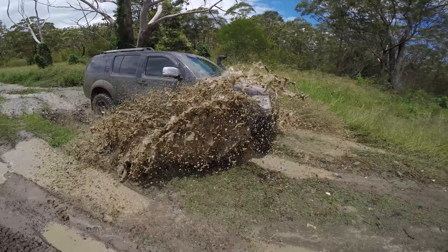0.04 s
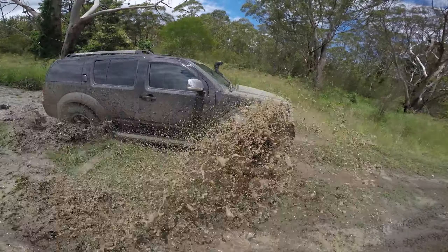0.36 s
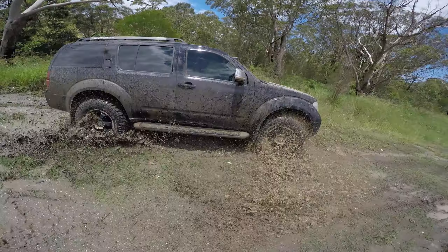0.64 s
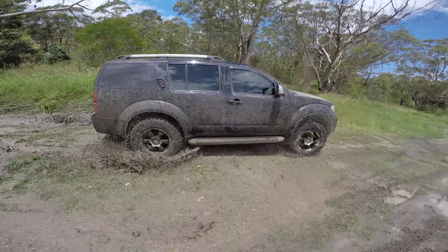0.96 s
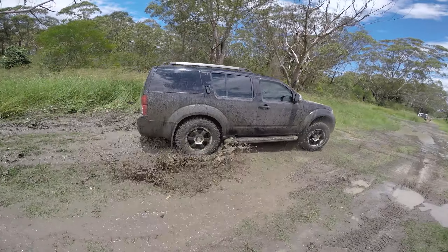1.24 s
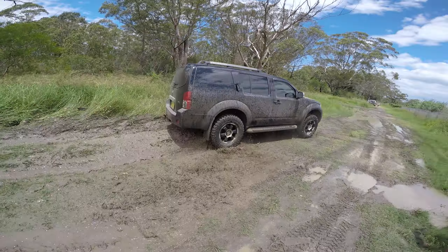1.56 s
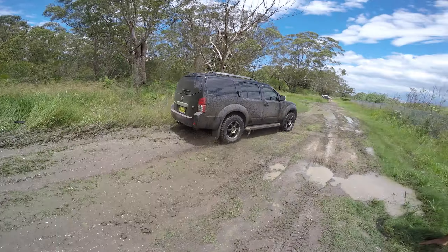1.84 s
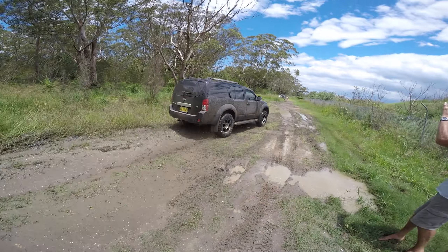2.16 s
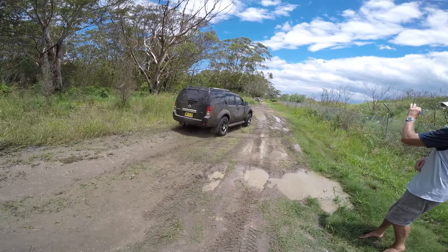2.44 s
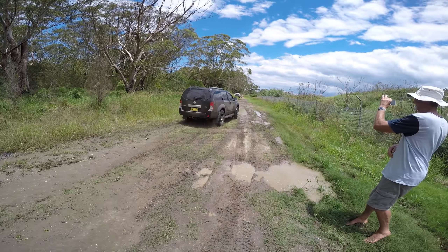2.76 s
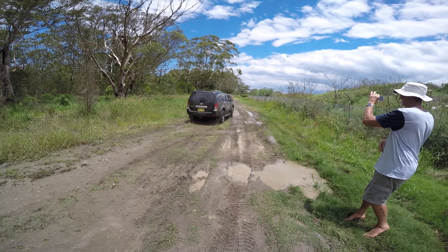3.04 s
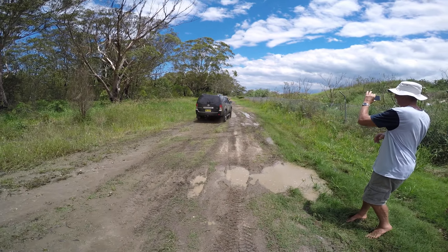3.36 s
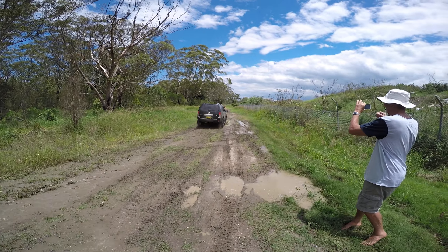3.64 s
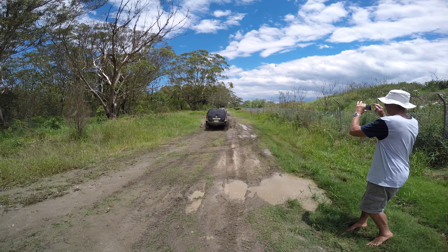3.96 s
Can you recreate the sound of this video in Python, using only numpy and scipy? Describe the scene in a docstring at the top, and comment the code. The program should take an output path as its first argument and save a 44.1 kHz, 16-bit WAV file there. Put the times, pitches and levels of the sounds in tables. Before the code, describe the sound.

Loud muddy splashing from a passing vehicle, then fading tyre crunch under buffeting wind.

```python
"""On a rough dirt track, an SUV ploughs through a mud puddle a few metres away, then drives off.
The bow wave and the front and rear wheels each throw a sheet of mud that rains down as countless impacts.
Tyres crunch on wet grit and churn the water; the engine's firings drone low through a muffled exhaust.
Wind buffets the camera, whose closed plastic case colours everything with its resonances."""
import sys
import numpy as np
from scipy import signal
from scipy.fft import rfft, irfft
from scipy.io import wavfile
from scipy.ndimage import uniform_filter1d

SR = 44100
rng = np.random.default_rng(int(sys.argv[2]) if len(sys.argv) > 2 else 0)


def to_wav(s):
    """Save 16-bit WAV."""
    ch = np.atleast_2d(s).T  # columns
    pcm = np.round(np.clip(ch, -1, 1) * 32767)  # PCM
    wavfile.write(sys.argv[1], SR, pcm.astype(np.int16))


N = 176400
T = np.arange(N) / SR


def undb(db):
    """Amplitude ratio of a level in decibels."""
    return 10 ** (np.asarray(db) / 20)


def unit(x):
    """Normalisation to rms 1."""
    return x / np.sqrt(np.mean(x ** 2))


def curve(rows):
    """Amplitude envelope interpolated between rows of time_s, level_db."""
    return undb(np.interp(T, *np.array(rows).T))


def filtered(x, db_at):
    """Minimum-phase filter: folding the cepstrum makes the gain db_at(hz) causal."""
    size = 2 * N
    hz = np.maximum(np.arange(N + 1) * SR / size, 1)
    cepstrum = irfft(np.log(undb(db_at(hz))))
    cepstrum[1:N] *= 2
    cepstrum[N + 1:] = 0
    return irfft(rfft(np.tile(x, 2)) * np.exp(rfft(cepstrum)))[N:]


def colour(x, points):
    """Spectral shaping by rows of frequency_hz, gain_db; the result has rms 1."""
    hz, db = np.array(points).T
    f = np.maximum(np.arange(N // 2 + 1) * SR / N, 1)
    gain = undb(np.interp(np.log(f), np.log(hz), db))
    return unit(irfft(rfft(x) * gain, N))


def walk(rate_hz):
    """Slow random modulation: random steps smoothed twice, at rms 1."""
    k = max(int(SR / rate_hz), 1)
    steps = np.repeat(rng.standard_normal(N // k + 1), k)
    return unit(uniform_filter1d(uniform_filter1d(steps, k), k)[:N])


def impacts(per_s, spread_db):
    """Shot noise: independent tiny impacts, many weak and a few strong."""
    hit = rng.random(N) < per_s / SR
    size = np.minimum(rng.exponential(size=N), 5)
    sign = rng.choice([-1, 1], N)
    return hit * sign * undb(spread_db * size)


def bursts(rows, attack_s, octaves):
    """Heavily damped vibration: each knock is a band of noise that decays exponentially."""
    out = np.zeros(N)
    f = np.maximum(np.arange(SR // 4 + 1) * 2, 1)
    for start_s, db, centre_hz, decay_s in rows:
        band = 1 / (1 + (np.log2(f / centre_hz) / octaves) ** 4)
        body = unit(irfft(rfft(rng.standard_normal(SR // 2)) * band))
        body = unit(body / np.sqrt(abs(signal.hilbert(body))))  # partly evens out the noise's envelope
        i = int(start_s * SR)
        t = T[:min(SR // 2, N - i)]
        envelope = np.minimum(t / attack_s, 1) * np.exp(-np.maximum(t - attack_s, 0) / decay_s)
        out[i:i + len(t)] += undb(db) * body[:len(t)] * envelope
    return out


def rumble():
    """Ambient noise: air and track lay a steady low band under everything."""
    # spectrum of the rumble: frequency_hz, gain_db
    spectrum = [(30, 6), (60, 15), (90, -17), (140, -16), (300, -24.5), (700, -18), (1500, -36)]
    return colour(rng.standard_normal(N), spectrum) * undb(-48.5)


def wind(steady_s=0.056):
    """Turbulent pressure: eddies shake the case with a deep flutter that follows the gusts."""
    # spectrum of the eddies: frequency_hz, gain_db
    spectrum = [(8, -11), (18, -2), (26, -1.5), (36, -9.5), (52, -25), (80, -35.5), (130, -49), (250, -60),
                (600, -81)]
    # strength of the wind on the case: time_s, level_db
    gusts = [(0, -16.5), (.08, -23), (.16, -16.5), (.28, -20.5), (.33, -16), (.46, -19), (.53, -27),
             (.68, -18.5), (.77, -23), (.86, -18), (1.04, -30), (1.15, -17), (1.22, -31), (1.28, -21),
             (1.35, -34.5), (1.44, -23), (1.54, -40), (1.59, -23), (1.71, -21), (1.9, -31), (2.0, -25),
             (2.17, -25.5), (2.22, -34), (2.27, -26), (2.6, -27), (2.85, -21), (3.04, -23.5), (3.11, -29.5),
             (3.27, -30), (3.36, -26.5), (3.58, -24.5), (3.64, -30.5), (3.76, -22), (4, -35.5)]
    eddies = colour(rng.standard_normal(N), spectrum)
    strength = np.sqrt(uniform_filter1d(abs(signal.hilbert(eddies)) ** 2, int(steady_s * SR)))
    return unit(eddies / strength) * curve(gusts)


def engine(firing_hz=70, wander=0.012):
    """Source and filter: a slightly uneven train of firing pulses sounds through a muffled exhaust."""
    # response of exhaust and body: frequency_hz, gain_db
    exhaust = [(40, -12), (70, 15), (140, -3.5), (210, 3.5), (290, -5), (400, -5.5), (800, -12),
               (2000, -49)]
    # the engine passing and receding: time_s, level_db
    passage = [(0, -71), (.9, -49.5), (1.5, -47), (1.85, -56), (2.3, -60.5), (3, -75), (4, -66)]
    cycles = np.floor(np.cumsum(firing_hz * (1 + wander * walk(rate_hz=5))) / SR)
    firings = np.diff(cycles, prepend=0)
    return colour(firings - firings.mean(), exhaust) * curve(passage)


def knocks():
    """Impact excitation: slow blows give low thumps, abrupt ones give high ticks."""
    # wheels and water thumping the body: start_s, level_db, centre_hz, decay_s
    thumps = [(.142, -29.5, 543, 0.008), (.222, -31, 86.5, 0.028), (.304, -35, 133, 0.013),
              (.36, -38.5, 180, 0.01), (.816, -40, 123, 0.021), (1.035, -50, 246, 0.023),
              (1.7, -55, 555, 0.034), (1.808, -41.5, 99, 0.021), (2.07, -43, 118, 0.03)]
    # grit and drops ticking nearby: start_s, level_db, centre_hz, decay_s
    ticks = [(.943, -42, 8000, .004), (1.495, -34, 3480, 0.01), (1.589, -37, 9800, 0.0012),
             (2.028, -37, 3300, 0.0045), (2.105, -42.5, 3580, 0.054), (2.245, -39, 2757, 0.0079),
             (3.436, -37, 2700, 0.0028)]
    return bursts(thumps, attack_s=0.006, octaves=0.6) + bursts(ticks, attack_s=0.0005, octaves=0.5)


def tyre_crunch(far_from_s=3.15, dulling_db_per_s=3, dull_above_hz=1200):
    """Shot noise of treads crunching wet grit in uneven spurts; the treble fades with distance."""
    # spectrum of the wet grit: frequency_hz, gain_db
    spectrum = [(200, -11), (500, -7), (900, -3.5), (1500, 2.5), (2400, 2.5), (3500, 7), (4400, 0),
                (5500, -9.5), (7500, -25.5), (10000, -20.5), (15000, -44)]
    # course of the crunch: time_s, relative_level_db
    levels = [(0, -41.5), (.26, -37), (.7, -37), (1.0, -38.5), (1.55, -41.5), (1.78, -41), (1.98, -43),
              (2.2, -45), (2.35, -43), (2.62, -46), (2.87, -44), (3.1, -44.2), (3.28, -46), (3.5, -45),
              (3.7, -48), (4, -48)]
    grit = colour(impacts(per_s=6000, spread_db=2), spectrum)
    grit *= undb(0.47 * walk(rate_hz=27.85))
    lows = signal.sosfiltfilt(signal.butter(1, dull_above_hz, fs=SR, output="sos"), grit)
    treble_gain = undb(-dulling_db_per_s * np.maximum(T - far_from_s, 0))
    return (lows + (grit - lows) * treble_gain) * curve(levels) * undb(-0.5)


def bubbles(count, lowest_hz=250, octaves=2.2, ring_cycles=11):
    """Bubble resonance: air in thick mud rings briefly, rising in pitch as it dies away."""
    t = T[:SR // 10]
    out = np.zeros(N + len(t))
    for when, pitch, size in rng.random((count, 3)):
        hz = lowest_hz * 2 ** (octaves * pitch)
        age = t * hz / ring_cycles
        envelope = undb(10 * size) * np.exp(-np.log(30) * age)
        i = int(when * N)
        out[i:i + len(t)] += envelope * np.sin(2 * np.pi * hz * t * (1 + 0.15 * age))
    return unit(out[:N])


def tyre_churn():
    """Air entrainment: tyres churn the muddy water into low slaps and gulping bubbles."""
    # spectrum of the slapping water: frequency_hz, gain_db
    spectrum = [(60, -3), (120, 1), (200, -4), (300, -12.5), (450, -6.5), (750, -5.5), (1100, -20.5),
                (2000, -31.5)]
    # course of the churning under the body: time_s, relative_level_db
    levels = [(0, -45.5), (.2, -40.5), (.65, -50), (.85, -43.5), (1.4, -50.5), (1.8, -56), (2.3, -62),
              (3.3, -66), (4, -59.5)]
    slaps = colour(impacts(per_s=700, spread_db=2), spectrum)
    gulps = bubbles(count=400) * undb(-12)
    return (slaps + gulps) * curve(levels) * undb(-1)


def mud_spray(flicker_db=0.5):
    """Superposed drop impacts: each sheet swells, holds and thins out; a few fat drops stand out."""
    # sheets of mud falling back from bow wave, front wheel and rear wheel:
    # peak_s, level_db, rise_db_per_s, fall_db_per_s, hold_s
    sheets = [(0.2, -40.5, 16, 11.5, 0.77), (0.518, -32.5, 30.5, 86, 0.2), (1.478, -41, 69, 30, 0.035)]
    # spectrum of the heavier, duller bow wave: frequency_hz, gain_db
    bow_wash = [(400, -8.5), (1200, -3.5), (2200, -29), (3100, 6.5), (3900, -4.5), (4800, -2), (6500, -10),
                (9000, -16.5), (11500, -17), (15000, -25)]
    # spectrum of the spray from a wheel: frequency_hz, gain_db
    wheel_spray = [(400, -11.5), (1200, -13), (2200, -9.5), (3000, 2.5), (3800, 2.5), (4800, -1),
                   (6500, -8), (9000, -10), (11500, -16.5), (15000, -18.5)]
    # spectrum of lone drops pattering down: frequency_hz, gain_db
    patter = [(1000, -30), (3000, 9), (5000, -2), (9000, -3.5), (15000, -6)]
    out = np.zeros(N)
    for sheet, spectrum in zip(sheets, (bow_wash, wheel_spray, wheel_spray)):
        peak_s, db, rise, fall, hold_s = sheet
        swell_db = db - rise * np.maximum(peak_s - T, 0) - fall * np.maximum(T - peak_s - hold_s, 0)
        mist = colour(impacts(per_s=14000, spread_db=1.5), spectrum)
        drops = colour(impacts(per_s=200, spread_db=1.8), patter) * undb(-17)
        out += (mist + drops) * undb(swell_db + flicker_db * walk(rate_hz=44.5))
    return out


def scene():
    """Superposition: the pressures of mud, vehicle and wind add at one microphone."""
    return (mud_spray() + tyre_crunch() + tyre_churn() + engine() + knocks() + wind() + rumble())[None]


def record(dry):
    """Enclosure resonance: the case rings, the microphone adds faint hiss, and a low-pass cuts the top."""
    # bell-shaped resonances (+) and dips (-) of the camera case: centre_hz, half_width_hz, gain_db
    resonances = [(549, 50, -4), (700, 24, 0), (1035, 60, 3.5), (1193, 52, -7.5), (1360, 140, 5),
                  (1782, 23, 3.5), (2308, 28, -10.5), (2490, 14, -1.5), (2790, 84, 5), (3009, 78, -7),
                  (3146, 15, 2), (3240, 35, -3.5), (3446, 59, 3.5), (3740, 51, 5.5), (3930, 42, -3.5),
                  (4180, 122, 4), (4727, 96, -13), (5020, 47, -7), (5200, 62, 1), (5600, 50, 0),
                  (5780, 56, -13), (6800, 87, 4.5), (9970, 390, 5.5), (10130, 700, -5)]
    hiss_db, top_hz = -89, 15300

    def case_db(f):
        """Frequency response of the case: its peaks and dips add in decibels."""
        return sum(db * np.exp(-0.5 * ((f - hz) / width) ** 2) for hz, width, db in resonances)

    heard = filtered(dry[0], case_db) + undb(hiss_db) * rng.standard_normal(N)
    low_pass = signal.ellip(10, 0.2, 80, top_hz, fs=SR, output="sos")
    return signal.sosfilt(low_pass, heard)[None]


dry = scene()
out = record(dry)
to_wav(out)
```